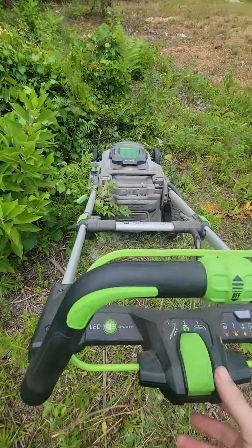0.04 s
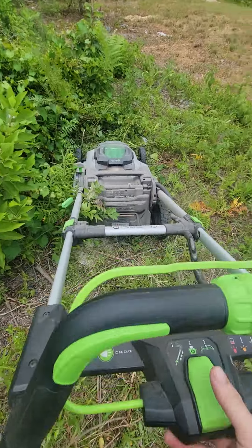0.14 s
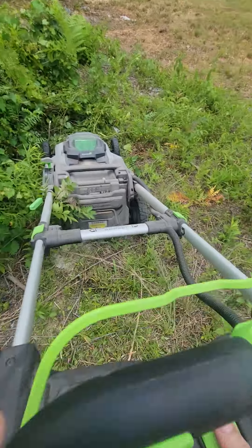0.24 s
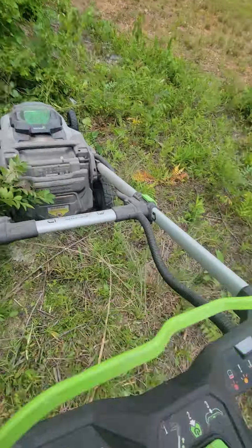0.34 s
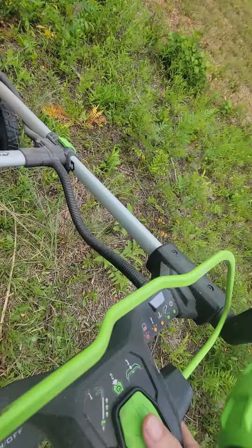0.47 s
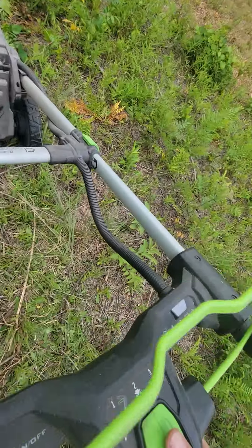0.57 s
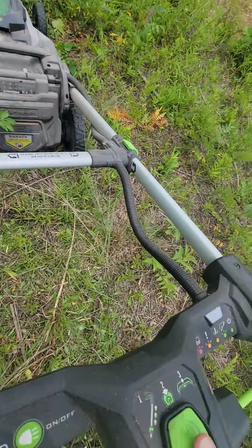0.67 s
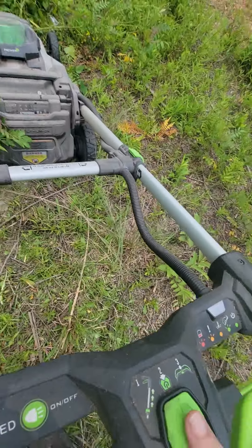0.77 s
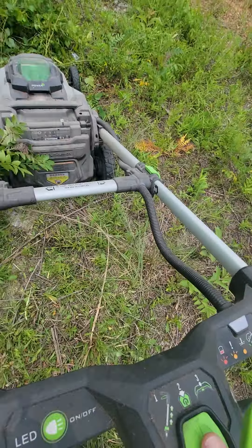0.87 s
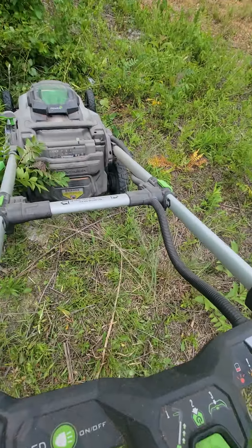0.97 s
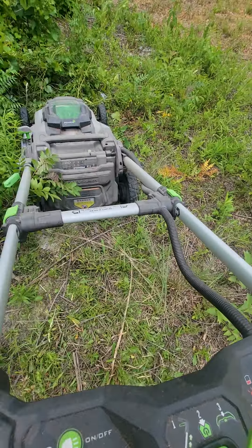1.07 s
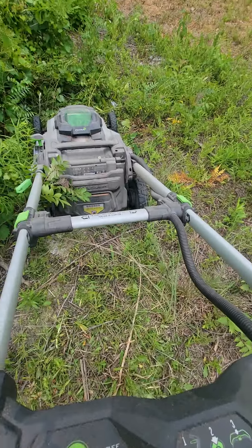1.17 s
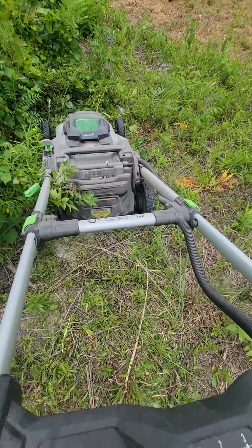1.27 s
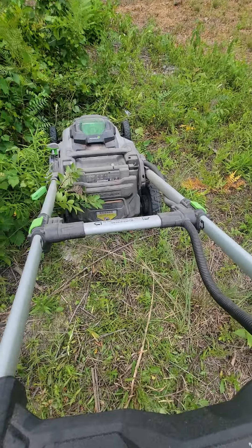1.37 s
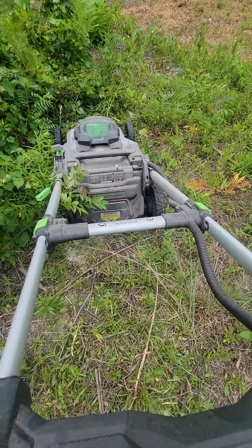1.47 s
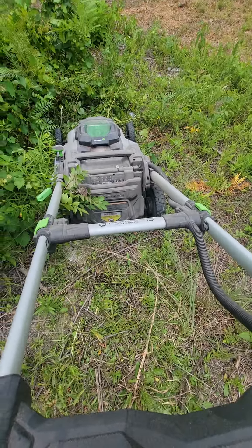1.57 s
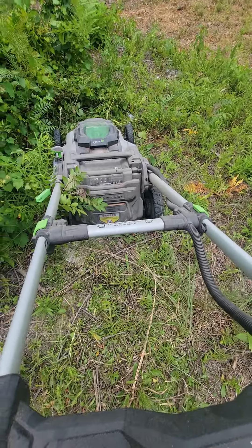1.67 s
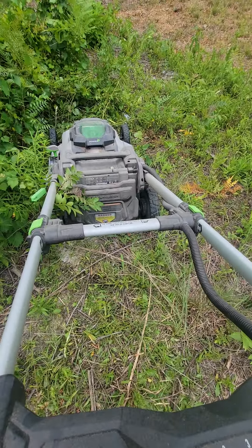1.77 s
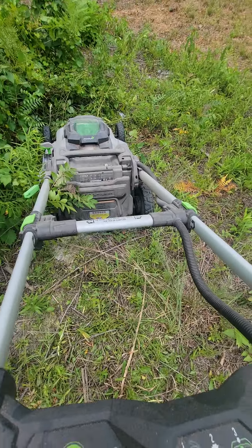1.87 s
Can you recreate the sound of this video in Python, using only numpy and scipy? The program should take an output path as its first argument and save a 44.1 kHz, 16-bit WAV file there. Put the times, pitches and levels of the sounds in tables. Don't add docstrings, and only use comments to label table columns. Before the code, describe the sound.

Plastic switches and a wire bail click and snap on a mower handle, then an electric motor whirs up through weeds into a steady hum.

```python
import sys
import numpy as np
from scipy import signal
from scipy.fft import rfft, irfft
from scipy.io import wavfile
from scipy.ndimage import uniform_filter1d

SR = 44100
rng = np.random.default_rng(int(sys.argv[2]) if len(sys.argv) > 2 else 0)


def boost(x):
    u = np.asarray(x, float) / 20
    return 10 ** u


def to_wav(sig):
    pcm = np.clip(np.atleast_2d(sig), -1, 1) * 32767
    pcm = np.round(pcm).astype(np.int16)
    wavfile.write(sys.argv[1], SR, pcm.T)


N = 248724
TIME, FREQ = np.arange(N) / SR, np.maximum(np.arange(N // 2 + 1) * SR / N, 1)

POLES = 15
FULL_HZ = 90
BAIL_HZ, LATCH_HZ, LEVER_HZ, WIRE_HZ, SPRING_HZ = 1222, 3300, 7290, 9308, 11920

# time_s, blade_passes_hz
SPIN_UP = [(3.06, 0), (3.15, 2), (3.22, 2.8), (3.29, 4.7), (3.4, 9.3), (3.506, 14.2), (3.748, 23.45),
           (3.914, 30.4), (4.552, 53.6), (4.62, 56.7), (4.706, 62.2), (4.942, 76.2), (5.108, 83.8),
           (5.288, 89.4), (5.412, 91.6), (5.64, 94.2)]
# multiple_of_shaft_rate, level_db, exponent_of_speed
BLADE_TONES = [(2, 2.5, 2.8), (3, -18, 2), (4, -2, 1.6), (5, -13, 2), (6, -6, 1), (7, -21, 2), (8, -7, 1.5),
               (9, -18, 2), (10, -7, 1.2), (12, -8, 2), (14, -18, 2), (16, -8, 1.8), (18, -16, 2),
               (20, -16, .8)]
# multiple_of_pole_tone, level_db
WHINE_OVERTONES = [(1, -1), (2, 0), (3, -6), (4, -6), (5, -13)]
# centre_hz, width_hz, level_db
HOUSING_MODES = [(230, 140, -32), (480, 110, -33), (600, 110, -34.5), (690, 80, -39), (810, 150, -31),
                 (1000, 200, -43), (1190, 130, -41), (1500, 350, -45), (2650, 260, -46), (3050, 200, -50),
                 (3400, 240, -42)]
# centre_hz, width_hz, level_db
DECK_MODES = [(175.5, 13, -3), (250.6, 120, 10), (320, 45, 14), (465, 85, 4)]
# time_s, level_db
WEED_DRAG = [(3.06, -87), (3.14, -62), (3.18, -47), (3.26, -29.5), (3.34, -31.5), (3.6, -22.5), (3.68, -29),
             (3.8, -23.5), (3.92, -28), (4.45, -34), (4.95, -34), (5.25, -26), (5.5, -21.5), (5.64, -28)]
# frequency_hz, density_db_per_hz
RUSH_SPECTRUM = [(150, -35), (250, -6), (368, -9), (485, -10), (542, -4), (632, -7), (754, -2),
                 (1040, -5.5), (1460, -3), (1750, -7.5), (2300, -14.5), (3400, -34.5), (4550, -47),
                 (7700, -120)]
# frequency_hz, density_db_per_hz
CHAFF_SPECTRUM = [(880, -28), (1500, -10), (1680, 4.5), (3780, -2), (4300, -5.5), (6760, -4), (9040, -6),
                  (11000, -10.5), (15200, -10), (16000, -30), (16500, -37.5)]
# start_s, peak_db, brightest_hz
SLOW_STEMS = [(3.2665, -38.5, 4440), (3.3916, -29.5, 3920), (3.4832, -24, 3430), (3.5507, -21, 5000),
              (3.6096, -28, 5650), (3.6656, -25.5, 5420), (3.714, -31, 3890), (3.7503, -29, 4050),
              (3.7986, -27, 3140), (3.8353, -27, 5300), (3.873, -23, 3470), (3.908, -29.5, 3670),
              (3.9468, -31.5, 3800), (3.9789, -29.5, 3660)]
# start_s, peak_db, brightest_hz
STRAY_STEMS = [(4.013, -45.5, 1900), (4.07, -32.5, 2000), (4.125, -37, 1700), (4.181, -29, 8400),
               (4.2385, -36, 3480), (4.465, -34, 3500), (4.833, -25.5, 6440), (4.8698, -22, 4500),
               (4.9225, -21.5, 8200), (4.953, -29, 3660), (5.144, -25.5, 5840), (5.32, -17, 5070),
               (5.4068, -23, 4380), (5.512, -22, 11250)]
# start_s, peak_db, brightest_hz
TWIG_CRACKS = [(4.050, -38, 3350), (4.155, -50, 3000), (4.278, -38.5, 1900), (4.3453, -30.5, 3250),
               (4.363, -27.5, 8020), (4.379, -35, 2900), (4.405, -38.5, 5000), (4.4165, -28, 3000),
               (4.426, -37, 8500), (4.5008, -27.5, 4170), (4.521, -21, 2840), (4.542, -25, 1750),
               (4.568, -28, 3470), (4.5867, -31, 3000), (4.668, -44.5, 3500), (4.794, -26.5, 6000),
               (4.877, -31.5, 4360), (5.0745, -33, 3500), (5.162, -25, 4000), (5.222, -30, 2490),
               (5.273, -18, 3540), (5.362, -16.5, 4580), (5.381, -16.5, 6900), (5.5833, -24.5, 9790)]
# start_s, peak_db, pitch_hz, t60_s
DECK_BOOMS = [
    (3.41, -15, 245, .13),
    (3.487, -16, 305, .15),
    (3.5, -20, 190, .1),
    (3.562, -11, 320, .08),
    (3.566, -18, 175, .12),
    (3.577, -10, 300, .09),
    (3.622, -18, 255, .13),
    (3.638, -18, 190, .07),
]
# start_s, peak_db, body_hz, treble_db, ring_down_s
SWITCH_SNAPS = [(.362, -8.5, 960, -36, 0.044), (.3672, 1.5, 955, -4, .026),
                (.3795, -24.5, 1485, -21.5, 0.009), (.3825, -13.5, 2090, -2, 0.021),
                (.408, -28, 520, -18.5, 0.051), (.6915, -10, 900, -0.5, 0.06),
                (1.7362, -15.5, 1250, -33, 0.018), (2.44, -23, 5340, -48.5, .06),
                (2.5185, -16.5, 2740, -38.5, 0.029), (2.919, -8.5, 1950, -18, 0.028),
                (2.9197, -15, 4400, -29.5, 0.017), (.6925, -19, 3220, -29, 0.051),
                (1.635, -54, 4500, -42.5, 0.011), (1.642, -34.5, 680, -46.5, .015),
                (1.795, -43, 6050, -40.5, .015), (1.897, -38, 3300, -44, .02),
                (2.9695, -15, 3300, -18.5, 0.072), (2.9705, -19.5, 1370, -45, 0.027),
                (2.9865, -12.5, 1530, -37.5, 0.032), (.692, -12.5, 1577, -40, 0.052),
                (2.981, -8, 3780, -10, 0.054), (3.062, -38, 5000, -37, .015), (3.068, -34, 900, -43, 0.018),
                (2.986, -6.5, 2960, -4.5, 0.039)]
# start_s, peak_db
NAIL_TICKS = [
    (0.031, -30),
    (0.044, -27.5),
    (.065, -35),
    (0.072, -29),
    (.079, -32.5),
]
# start_s, peak_db, body_hz
PLASTIC_TAPS = [(0.576, -41, 1110), (0.611, -32.5, 1830), (0.7233, -25, 1280), (0.842, -45.5, 1450),
                (.865, -41, 4500), (1.543, -39, 1920), (1.596, -34.5, 895), (1.6198, -29, 850),
                (1.731, -23.5, 1370), (1.7434, -22.5, 1280), (1.838, -41, 700), (2.513, -20.5, 980),
                (2.526, -33, 506), (2.651, -42, 1780), (0.395, -31, 1200), (0.402, -38.5, 1110),
                (0.446, -29, 1280), (1.781, -29.5, 476), (1.792, -40, 534), (1.82, -37, 2830),
                (1.884, -26, 3110), (2.386, -41, 1990), (2.442, -24.5, 740), (2.482, -29, 667),
                (2.5075, -21.5, 1240), (2.534, -28, 1300), (2.601, -36, 1240), (2.881, -41, 1580),
                (2.547, -18.5, 1270), (2.563, -30.5, 780), (2.594, -37, 1340), (2.6238, -34, 2600),
                (2.644, -40.5, 1600), (2.9117, -22, 930), (2.938, -28, 1500), (2.962, -23, 2650)]
# start_s, pitch_hz, level_db, t60_s
METAL_RINGS = [
    (0.694, WIRE_HZ, -31, 0.081),
    (0.693, LEVER_HZ, -27.5, 0.067),
    (.724, BAIL_HZ, -37, 0.18),
    (1.884, BAIL_HZ, -30.5, 0.12),
    (1.881, LATCH_HZ, -29, 0.072),
    (2.987, WIRE_HZ, -18, 0.085),
    (2.987, SPRING_HZ, -34, 0.06),
]
# start_s, length_s, level_db, centre_hz
FINGER_RUBS = [(0.025, 0.25, -53, 770), (0.344, 0.05, -29.5, 1180), (0.386, 0.024, -36.5, 1150),
               (0.415, 0.034, -39.5, 5000), (0.423, 0.042, -38.5, 2990), (0.444, 0.0078, -54, 1376),
               (0.374, 0.076, -42, 1230), (0.419, 0.038, -34, 1860), (0.538, 0.089, -51, 480),
               (0.602, 0.042, -46.5, 1880), (0.678, 0.047, -24.5, 1150), (0.837, 0.021, -46, 1370),
               (0.867, 0.082, -54.5, 1600), (1.245, 0.077, -54, 653), (1.531, 0.069, -49.5, 1880),
               (1.579, 0.072, -51.5, 990), (1.875, 0.021, -42.5, 3250), (1.752, 0.043, -51, 2380),
               (2.449, 0.039, -50, 1030), (2.548, 0.022, -53.5, 8100), (2.371, 0.08, -53.5, 1770),
               (2.432, 0.028, -59, 5100), (2.871, 0.14, -41.5, 1410), (2.942, 0.1, -35, 3050)]
# start_s, level_db
LEVER_RATTLES = [
    (0.697, -46),
    (1.737, -44.5),
    (2.44, -51.5),
    (2.923, -70),
    (2.99, -36),
]
# start_s, length_s, level_db, centre_hz
PALM_BUMPS = [
    (0.349, 0.071, -43.5, 160),
    (0.419, 0.033, -36, 326),
    (2.508, 0.025, -42, 560),
    (2.908, 0.029, -31, 460),
    (0.706, 0.046, -51, 218),
    (1.04, 0.057, -53, 400),
    (1.572, 0.085, -56.5, 220),
    (1.756, 0.099, -64, 259),
    (2.468, 0.17, -51, 194),
    (2.967, 0.16, -44.5, 158),
]
# start_s, length_s, level_db, centre_hz
PLASTIC_CREAKS = [
    (1.719, 0.052, -39, 1260),
    (2.5, 0.042, -34.5, 1500),
    (2.541, 0.03, -35.5, 1020),
    (2.578, 0.088, -49, 1140),
    (2.984, 0.048, -44, 440),
    (3.132, 0.083, -59.5, 2820),
]
# time_s, level_db
BREEZE = [
    (0, -49.5),
    (.3, -44.5),
    (1.1, -51.5),
    (1.4, -49.5),
    (2.24, -57),
    (2.5, -48.5),
    (2.8, -49.5),
    (3.0, -37),
    (3.15, -58),
    (4.2, -73),
]
# frequency_hz, density_db_per_hz
AIR_SPECTRUM = [(12, -48), (20, -22.5), (54, 5.5), (118, 0.5), (150, -5), (217, -10.5), (326, -10),
                (470, -12), (798, -6.5), (920, -17.5), (2600, -54.5), (3380, -82), (5720, -120)]
# frequency_hz, density_db_per_hz
HISS_SPECTRUM = [(710, -30), (1200, 0), (1900, -6), (2980, -7), (5450, -17), (7010, -15), (11100, -31),
                 (15100, -26), (15900, -30), (16300, -60)]
# frequency_hz, shared_fraction
PORT_LIKENESS = [(25, .4), (60, .95), (125, 1), (500, .85), (2000, .7), (8000, .3)]
# frequency_hz, lead_rad
MOWER_PHASE = [(0, -4), (95, 0.14), (225, 0.27), (290, 1.99), (600, 1.55), (1460, 2.5), (3270, 5),
               (4820, -1), (8350, -11), (12300, -35), (16300, 3.5)]
HANDLE_PHASE = [(0, -2), (690, 3.5), (2840, 5), (4820, -4.5), (8500, -11.5), (16300, -40)]
FIELD_PHASE = [(0, 0), (600, 1.9), (1400, 2.6), (16000, 5)]
# frequency_hz, difference_db
MOWER_BALANCE = [(60, -3.5), (380, -5), (900, 0), (4400, -4.5), (8120, 2.5), (15000, 1.5)]
HANDLE_BALANCE = [(100, -15), (1500, -7.5), (5000, -4.5), (10000, 2)]
FIELD_BALANCE = [(30, -5), (70, -2), (16000, -2)]
# time_s, left_minus_right_db
HEAD_TURN = [
    (0, 4.5),
    (.9, 0),
    (1.3, 0.7),
    (2.9, 0),
    (3.2, 3),
    (4.3, 1.5),
    (5, 1),
    (5.64, -2),
]


def mower():
    passes = blade()
    turn = np.cumsum(passes) / SR / 2
    beat = np.cos(4 * np.pi * turn + 1.24)
    drag_db = np.interp(TIME, *np.transpose(WEED_DRAG), left=-140)
    bright = np.clip(passes / 90, 0, 1) ** 2.5
    lines = whine(passes, turn) + blade_tones(passes, turn)
    noise = deck_thump(drag_db, beat, bright) + air_rush(passes, drag_db, beat) + chaff(drag_db, beat)
    return lines * [[1], [0]] + noise + swipes(passes)


def blade():
    return uniform_filter1d(curve(SPIN_UP), size=2000)


def law(db, power):
    return db + 20 * power * np.log10(np.maximum(blade(), .01) / FULL_HZ)


def housing_lift(hz):
    modes = [boost(db) ** 2 / (1 + (2 * (hz - centre) / width) ** 2) ** 3.2
             for centre, width, db in HOUSING_MODES]
    return np.sqrt(sum(modes))


def whine(passes, turn):
    eases_s, silent_s, eased_db = 4.19, 4.62, -18
    times = [eases_s, eases_s + .06, silent_s - .06, silent_s + .06]
    pull_db = np.interp(TIME, times, [0, eased_db, eased_db, 4 * eased_db])
    out = np.zeros(N)
    for k, db in WHINE_OVERTONES:
        hz = k * POLES * passes
        level = np.sqrt(2) * housing_lift(hz) * boost(3.5 + db + pull_db / k ** 2 + .8 * walk(20))
        if k > 2:
            level = level * np.clip(hz / 2600, 0, 1) ** 3
        out += level * np.sin(4 * np.pi * k * POLES * turn)
    out = out * np.clip((silent_s + .1 - TIME) / .04, 0, 1)
    return cut(out, 125, "high", order=4)


def blade_tones(passes, turn):
    out = np.zeros(N)
    for k, db, power in BLADE_TONES:
        level_db = law(db, power) + (.6 + k / 20) * walk(12)
        out += boost(level_db) * np.sin(2 * np.pi * k * turn + k)
    out = out * np.clip((passes - 38) / 16, 0, 1)
    return boost(-27.16) * cut(out, 67, "high", order=10)


def deck(push):
    ringing = sum(boost(db) * band(push, hz, width) for hz, width, db in DECK_MODES)
    return cut(cut(ringing, 95, "high"), 350, "low")


def deck_thump(drag_db, beat, bright):
    thump = unit(deck(grit(1.0) * boost(0.51 * beat)))
    return boost(drag_db - 1 - 8 * bright) * thump


def air_rush(passes, drag_db, beat):
    rush_db = both(law(-26.5, 0.57), drag_db + law(-3, 0.2))
    rush = colour(grit(2.7) * boost(1.65 * beat), RUSH_SPECTRUM)
    rush = flicker(rush, [200, 500, 800, 1200, 1800, 4000], 1.8, 18)
    slow_hz, fast_hz = 972, 3640
    edge_hz = slow_hz + (fast_hz - slow_hz) * np.clip(passes / 90, 0, 1) ** 6.85
    return boost(rush_db) * open_up(rush, edge_hz)


def chaff(drag_db, beat):
    level_db = law(-34, 0.83) + 0.5 * (drag_db - max(db for _, db in WEED_DRAG))
    grains = colour(grit(2.6) * boost(1.5 * beat), CHAFF_SPECTRUM)
    return boost(level_db) * flicker(grains, [1000, 3000, 5500, 9500, 17000], 1.5, 30)


def swipes(passes):
    out = np.zeros((2, N))
    stems = [(*row, 1) for row in SLOW_STEMS + STRAY_STEMS]
    stems += [(s + 0.023, db - 5.5, hz, 0.28) for s, db, hz in SLOW_STEMS[1:5]]
    stems += [(*row, .25) for row in TWIG_CRACKS]
    for s, db, hz, ring in stems:
        quick = passes[int(s * SR)] / FULL_HZ
        tear_s = 0.12 + quick * (0.035 - 0.12)
        spray = burst(ring * tear_s, spread_db=2.5, rise_s=0.00062 * ring)
        add(out, s, peak(band(spray, hz, 3300) + 0.078 * cut(spray, 2500, "high"), db))
        add(out, s, peak(band(spray, 2555, 77) + band(spray, 3390, 27), db - 12.5))
        body = band(spray, 1146, 90) + 0.97 * band(spray, 1200, 130)
        body = body + 0.24 * band(spray, 1780, 300) + 0.15 * band(spray, 2260, 420)
        add(out, s, peak(body, db))
        push = uniform_filter1d(np.abs(spray), size=800) * rng.standard_normal(spray.shape)
        add(out, s + .018, peak(deck(push), db + 7.5 - 12.5 * quick))
    t = np.arange(8192) / SR
    rise = np.sin(np.pi / 2 * np.minimum(t / 0.0045, 1)) ** 2
    for s, db, hz, t60 in DECK_BOOMS:
        add(out[0], s, boost(db - 60 * t / t60) * rise * np.sin(2 * np.pi * hz * t))
    return out


def handle():
    return ports(clicks() + metal_rings() + scrapes(), HANDLE_PHASE, HANDLE_BALANCE)


def clicks():
    out = np.zeros((2, N))
    tap_s = .032
    hits = SWITCH_SNAPS + [(s, db - 33, 690, db, tap_s) for s, db in NAIL_TICKS]
    hits += [(s, db, hz, db - 20.5, tap_s) for s, db, hz in PLASTIC_TAPS]
    strike = 1 + 3 * np.exp(-np.arange(3072) / SR / .0008)
    for s, db, hz, treble_db, t60 in hits:
        hit = burst(t60, spread_db=1.5, rise_s=.0003) * strike
        body = band(band(hit, hz, .6 * hz), hz, .3 * hz)
        body = body + .35 * band(band(hit, 1.43 * hz, .5 * hz), 1.43 * hz, .2 * hz)
        body = body + .3 * cut(band(hit, 910, 1300), 2500, "low")
        add(out, s, peak(body, db))
        tick = cut(burst(.2 * t60, spread_db=1.5, rise_s=.0006), 3000, "high")
        add(out, s, peak(cut(tick, 10000, "low", order=1), treble_db - 2))
    return out


def metal_rings():
    out = np.zeros((2, N))
    t = np.arange(SR // 4) / SR
    for s, hz, db, t60 in METAL_RINGS:
        add(out[0], s, boost(db - 60 * t / t60) * np.sin(2 * np.pi * hz * t))
    return out


def scrapes():
    out = np.zeros((2, N))
    rattles = [(s, 0.044, db, 870) for s, db in LEVER_RATTLES]
    rows = [(*row, -7.5) for row in FINGER_RUBS + rattles]
    rows += [(*row, -16) for row in PALM_BUMPS] + [(*row, -18.5) for row in PLASTIC_CREAKS]
    for s, length, db, hz, scuff_db in rows:
        progress = np.clip(np.arange(8192) / SR / length, 0, 1)
        grains = grit(3.5, (2, 8192)) * np.sin(np.pi * progress ** 0.69) ** 2
        grains = grains * boost(2.5 * np.repeat(rng.standard_normal(64), 128))
        rub = band(band(grains, hz, .9 * hz), hz, .8 * hz) + .3 * band(grains, 1.6 * hz, .07 * hz)
        scuff = cut(cut(grains, 3900, "high"), 7200, "low") + 0.12 * cut(grains, 6600, "high")
        piece = unit(rub) * boost(db) + unit(scuff) * boost(db + scuff_db)
        add(out, s, piece * np.sqrt(length * SR / 8192 / 2))
    return out


def field():
    gust_db = curve(BREEZE)
    air = colour(rng.standard_normal((2, N)), AIR_SPECTRUM)
    wind = cut(air, 130, "low", order=4)
    murmur = flicker(unit(air - wind), [60, 300, 800, 4000], 4.4, 23.22)
    hiss = colour(rng.standard_normal((2, N)), HISS_SPECTRUM) * boost(-66 + gust_db - np.mean(gust_db))
    wind_db = both(gust_db, law(-42, 0.5)) + 0.5 + 1.2 * walk(21)
    return unit(wind) * boost(wind_db) + murmur * boost(gust_db - 2) + hiss


def ports(x, lead, side):
    a, b = rfft(x)
    alike = np.clip(on_log(PORT_LIKENESS), 0, 1)
    lag = np.exp(-1j * np.interp(FREQ, *np.transpose(lead)))
    right = alike * a * lag + np.sqrt(1 - alike ** 2) * b
    tilt = boost(on_log(side) / 2)
    return irfft(np.array([a * tilt, right / tilt]), N)


def curve(rows):
    return np.interp(TIME, *np.transpose(rows))


def on_log(points):
    hz, value = np.transpose(points)
    return np.interp(np.log(FREQ), np.log(hz), value)


def unit(x):
    return x / np.sqrt(np.mean(x ** 2))


def peak(x, db):
    return x * boost(db) / np.max(np.abs(x[0]))


def both(a_db, b_db):
    return 10 * np.log10(boost(a_db) ** 2 + boost(b_db) ** 2)


def colour(x, points):
    return unit(irfft(rfft(x) * boost(on_log(points)), N))


def band(x, hz, width_hz):
    return signal.lfilter(*signal.iirpeak(hz, hz / width_hz, fs=SR), x)


def cut(x, hz, kind, order=2):
    return signal.sosfilt(signal.butter(order, hz, kind, fs=SR, output="sos"), x)


def open_up(x, edge_hz):
    tops_hz = 700 * 2 ** (np.arange(7) / 3)
    lows = [cut(x, hz, "low", order=4) for hz in tops_hz] + [x]
    out = lows[0]
    for lo, hi, hz in zip(lows, lows[1:], tops_hz):
        out = out + (hi - lo) * (0.077 + 1 / (1 + (hz / edge_hz) ** 6))
    return out


def walk(rate):
    steps = np.repeat(rng.standard_normal(int(N / SR * rate) + 2), 8)
    steps = uniform_filter1d(steps, size=8)
    return unit(np.interp(TIME * rate * 8, np.arange(len(steps)), steps))


def flicker(x, edges_hz, depth_db, rate):
    spec = rfft(x)
    out = 0
    for lo, hi in zip(edges_hz, edges_hz[1:]):
        out = out + irfft(spec * ((FREQ >= lo) & (FREQ < hi)), N) * boost(depth_db * walk(rate))
    return out


def grit(spread_db, shape=(2, N)):
    sizes = np.minimum(rng.exponential(size=shape[1]), 5)
    return rng.standard_normal(shape) * boost(spread_db * (sizes - 1))


def burst(t60, spread_db, rise_s):
    t = np.arange(3072) / SR
    decay = boost(-60 * t / max(t60, .002))
    return grit(spread_db, (2, len(t))) * decay * np.minimum(t / rise_s, 1)


def add(out, s, piece):
    i = int(s * SR)
    out[..., i:i + piece.shape[-1]] += piece[..., :N - i]


def scene():
    heard = ports(mower(), MOWER_PHASE, MOWER_BALANCE) * (TIME > 3)
    heard = heard + handle() + ports(field(), FIELD_PHASE, FIELD_BALANCE)
    return heard * boost(curve(HEAD_TURN) * [[.5], [-.5]])


def low_pass(x):
    return signal.sosfilt(signal.butter(12, 16690, fs=SR, output="sos"), x)


def record(dry):
    mix = np.tanh(dry / 1.164) * 1.155
    return low_pass(mix)


dry = scene()
out = record(dry)
to_wav(out)
```